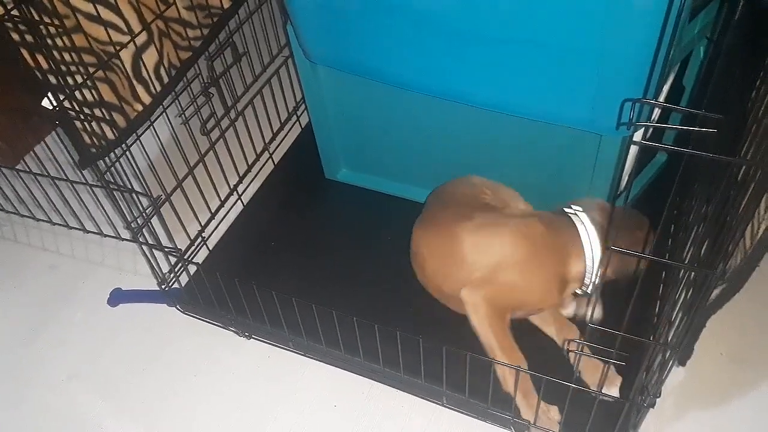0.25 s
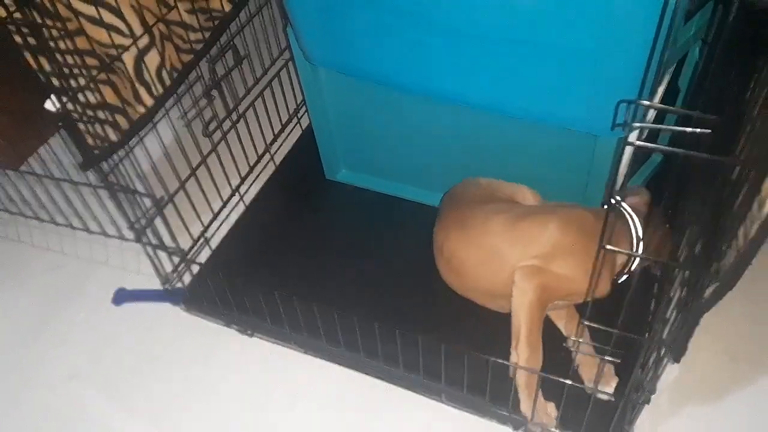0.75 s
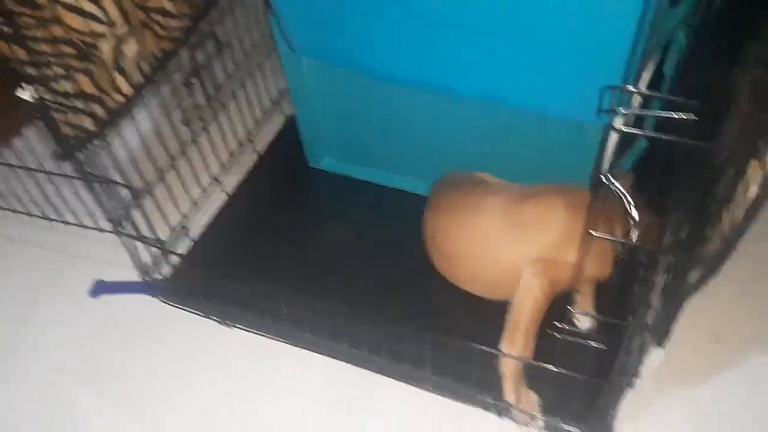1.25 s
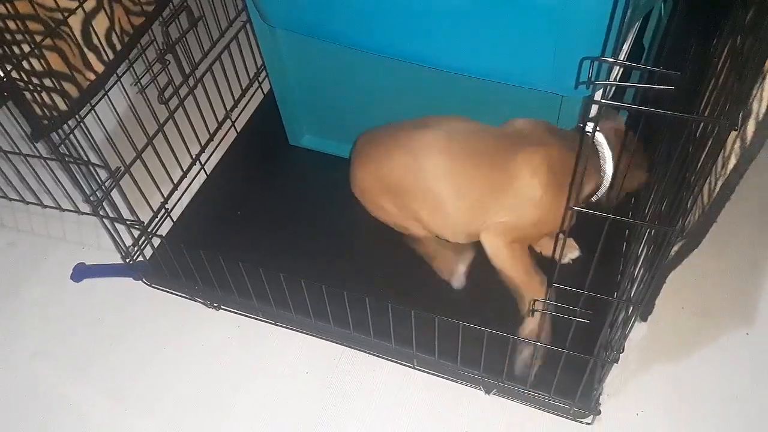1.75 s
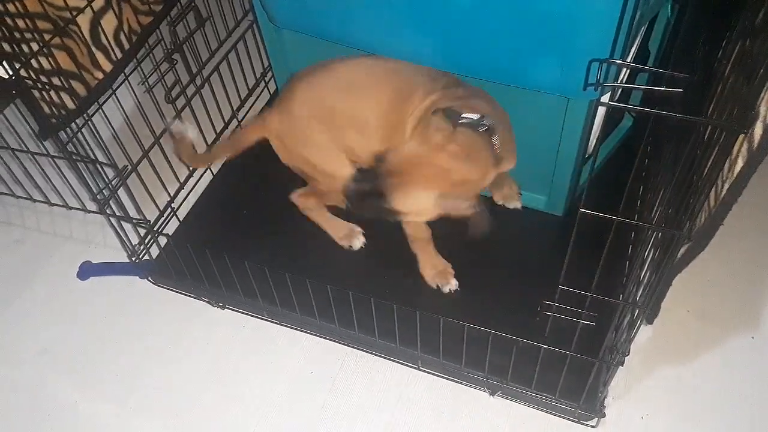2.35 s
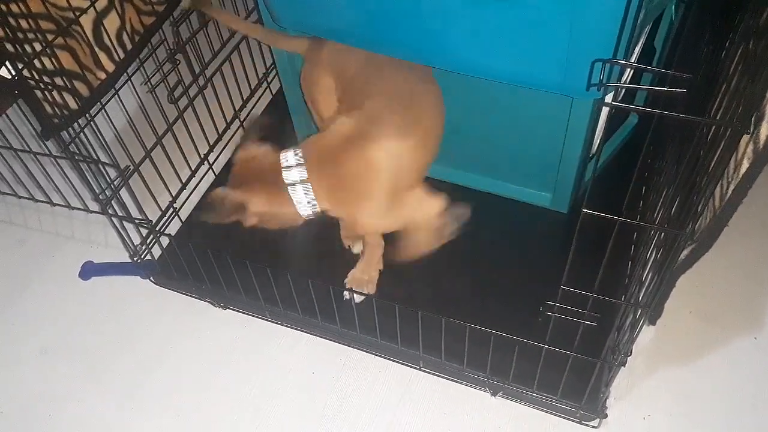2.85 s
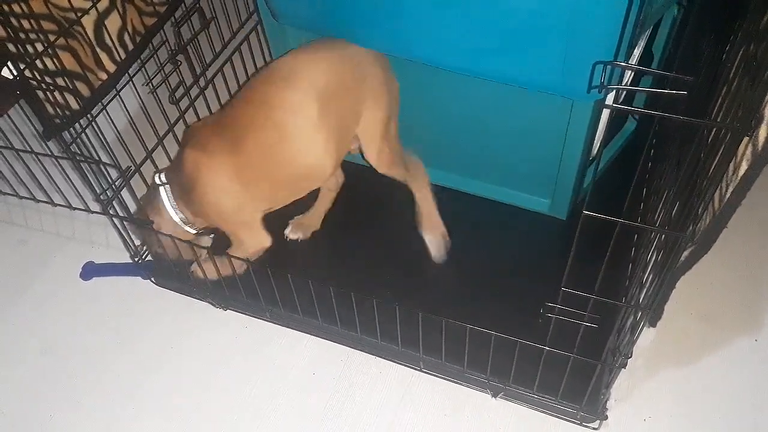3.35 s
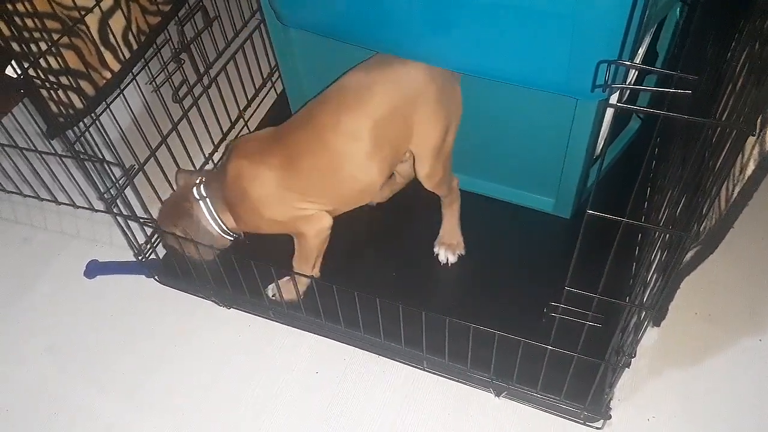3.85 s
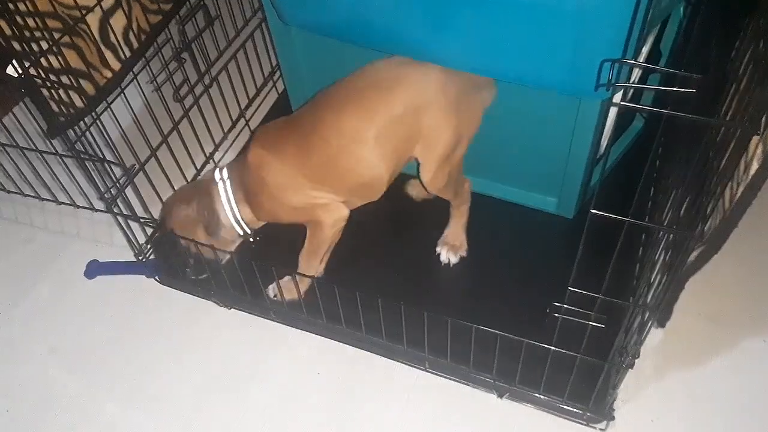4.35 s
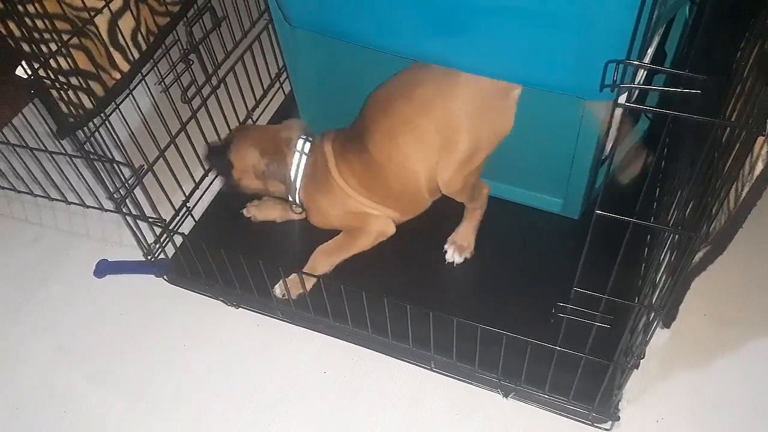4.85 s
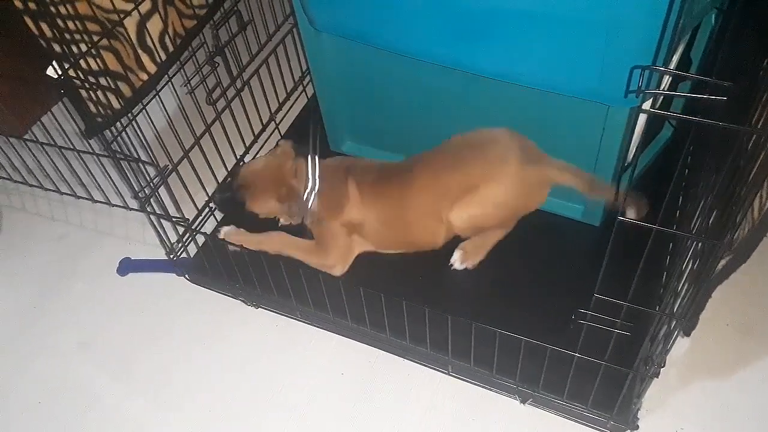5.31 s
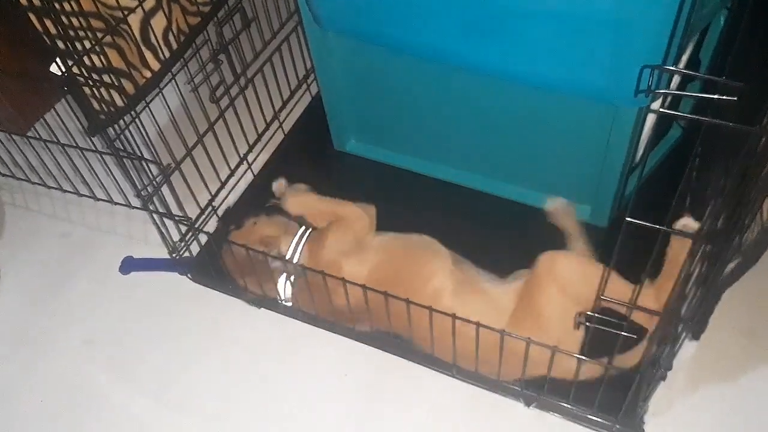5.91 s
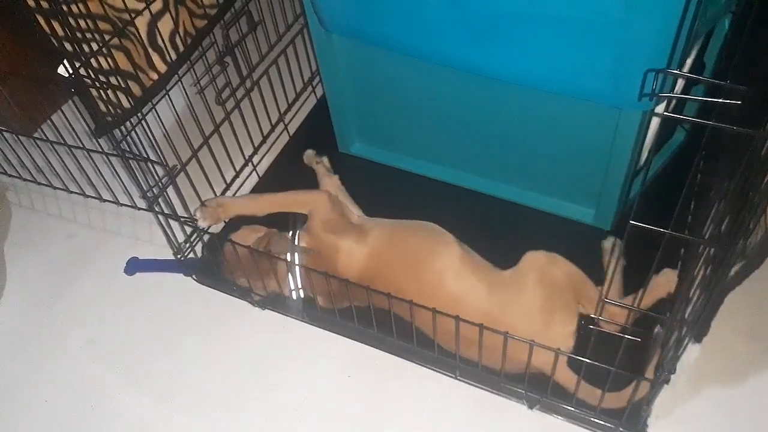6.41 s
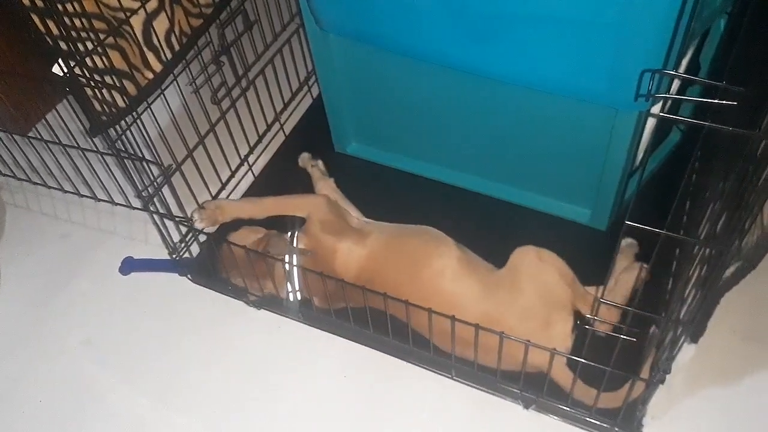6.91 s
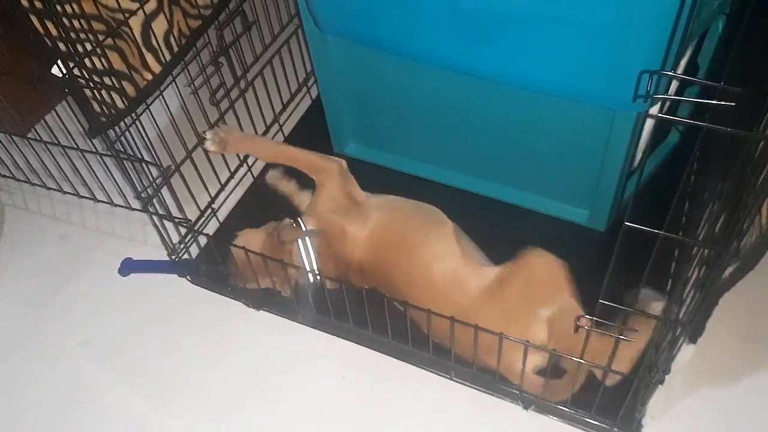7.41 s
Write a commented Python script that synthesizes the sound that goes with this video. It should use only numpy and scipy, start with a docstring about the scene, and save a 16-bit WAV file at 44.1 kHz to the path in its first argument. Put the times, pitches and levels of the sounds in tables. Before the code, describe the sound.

A puppy moves about in a wire crate with a loose plastic tray, heard close in a bare, echoing room with soft air noise and faint appliance hum. Light claw scrapes and a brief wire ring open the scene, then it is mostly quiet until 1.4 s, when hard knocks and bar clicks begin. From 1.8 to 3.8 s there is a dense scramble: scratching claws, rattling panels, singing wires and heavy padded thumps near 2.6, 3.05 and strongest at 3.4. Small scuffs follow around 4.4. From 4.5 to 5.2 s comes a hoarse, fluttering, low growl with airy rasp, ending in a thump. Scrapes lead to the loudest sharp plastic snap and clatter at 5.7, then rattles fading by 6.4. Near quiet follows, with one faint scuff at 7.2. A shorter, breathier growl runs from 7.25 to about 7.7 over a low tray rumble.

```python
"""Thumps, scrapes and clattering bars: a puppy scrambles about in a wire crate with a plastic tray,
in an echoing room, and twice lets out a hoarse, fluttering growl.
Paws and claws make bursts of tiny catches that ring the modes of tray, frame, bars and wires.
The growl is a run of throat pulses, gated by flapping tissue and shaped by moving resonances, with air
noise at the teeth. Echoes, standing waves, low rolling rumbles and steady air with hum surround it."""
import sys
import numpy as np
from scipy import signal
from scipy.fft import rfft, irfft
from scipy.io import wavfile
from scipy.ndimage import uniform_filter1d

SR = 44100
rng = np.random.default_rng(int(sys.argv[2]) if len(sys.argv) > 2 else 0)


def wav_out(sig):
    """Save sig, one row per channel (or a flat mono array), as 16-bit PCM at SR to the path in sys.argv[1]."""
    wavfile.write(sys.argv[1], SR, np.round(np.clip(np.atleast_2d(sig).T, -1, 1) * 32767).astype(np.int16))


N = 338247

# modes of the plastic tray: f/Hz, level/dB, t60/s
TRAY_MODES = [(62.5, -3, 0.5), (113.7, -9, 0.55), (144, -9.5, 0.061), (224, -0.5, 0.045), (310, 0, 0.037),
              (426, 1, 0.036), (546, 3, 0.015), (680, -2.5, 0.025), (810, 0, 0.013)]


def amp(db):
    """Decibels to gain."""
    return 10 ** (np.asarray(db) / 20)


def evened(x):
    """Scales to rms 1."""
    return x / np.sqrt(np.mean(x ** 2) + 1e-20)


def unit(x):
    """Scales to energy 1."""
    return x / np.sqrt(np.sum(x ** 2) + 1e-20)


def read(points, hz):
    """Reads a spectrum on a log-frequency axis."""
    f, value = np.transpose(points)
    return np.interp(np.log(hz + 1), np.log(f + 1), value)


def colour(x, points):
    """Filters by a spectrum in dB."""
    gain = amp(read(points, np.fft.rfftfreq(len(x), 1 / SR)))
    return irfft(rfft(x) * gain, len(x))


def band(x, lo_hz, hi_hz, order=3):
    """Causal band-pass."""
    edges_hz = [lo_hz, min(hi_hz, SR / 2 - 100)]
    return signal.sosfilt(signal.butter(order, edges_hz, "band", fs=SR, output="sos"), x)


def drift(count, size):
    """Slow random curve of rms 1, smoothed twice over size samples."""
    smooth = uniform_filter1d(rng.standard_normal(count), size)
    return evened(uniform_filter1d(smooth, size))


def add(mix, s, sound):
    """Lays a sound in; it reaches the two microphones a few samples apart."""
    lags = rng.permutation([0, rng.integers(3, 11)])
    for channel, lag in zip(mix, lags):
        start = round(s * SR) + lag
        part = channel[max(start, 0):][:len(sound) + min(start, 0)]
        part += sound[max(-start, 0):][:len(part)]


def ring(drive, modes):
    """Dying modes; every catch lands somewhere else and so weights them differently."""
    out, catches = 0, np.flatnonzero(drive)
    for hz, db, t60 in modes:
        weighted = np.zeros(len(drive))
        weighted[catches] = drive[catches] * rng.standard_normal(len(catches))
        r = np.exp(-np.log(1000) / (t60 * SR))  # decay per sample
        poles = [1, -2 * r * np.cos(2 * np.pi * hz / SR), r * r]
        mode = signal.lfilter([1, 0, -1], poles, weighted + 1e-18)
        out = out + amp(db) * unit(mode)
    return out


def resonate(x, hz, width):
    """A steep resonance that follows the curve hz, at rms 1."""
    turn = np.exp(2j * np.pi * np.cumsum(hz * np.ones(len(x))) / SR)
    r = np.exp(-np.pi * width / SR)
    # shift the resonance down to 0 Hz, smooth there, shift back
    smooth = signal.lfilter([1], [1, -2 * r, r * r], x / turn)
    return evened((turn * smooth).real)


def grains(force, per_s, spread_db):
    """Tiny catches of uneven size at random moments under a force curve."""
    size = amp(spread_db * np.minimum(rng.exponential(1, len(force)), 3))
    sign = rng.choice([-1, 1], len(force))
    return force * size * sign * (rng.random(len(force)) < per_s / SR)


def contact_levels(db, weight_db, claw_db, bars_db):
    """Levels of frame, tray, bars, wires and fizz; harder claws bring up the wires and the fizz."""
    wires_db, fizz_db = -14 + 0.85 * claw_db, -17 + claw_db
    return db + np.array([0, weight_db, bars_db, wires_db, fizz_db])


def crate(force, levels_db, per_s, spread_db):
    """Catches under a force curve ring frame, tray, bars and thin wires; claws add a fizz of their own."""
    # modes of the frame, the bars and the thin wires: f/Hz, level/dB, t60/s
    frame_modes = [(914, -10, 0.057), (1100, -2.5, 0.0041), (1103, 3, 0.011), (1364, -1.5, 0.0071),
                   (1660, -3, 0.0028), (1850, -15.5, 0.012)]
    bar_modes = [(2200, -0.5, 0.003), (2640, 3, 0.0012), (3033, -9.5, 0.027), (3560, 1, 0.0036),
                 (4370, -3, 0.0032)]
    wire_modes = [(5120, -3.5, 0.0017), (6410, -14.5, 0.018), (6430, -1.5, 0.0019)]
    bar_spread = 0.081  # share by which the pitch of the bars varies between contacts
    drive = np.pad(grains(force, per_s, spread_db), (0, SR // 10))  # room for the ring to die away
    detuned = [(hz * (1 + bar_spread * rng.uniform(-0.85, 1)), db, t60) for hz, db, t60 in bar_modes]
    parts = [band(ring(drive, frame_modes), 857, 3140, order=4),
             band(ring(drive, TRAY_MODES), 68, 1120, order=2),
             band(ring(drive, detuned), 1770, 4950),
             band(ring(drive, wire_modes), 4800, 7370, order=7),
             band(drive, 5300, 14000, order=2)]
    mixed = sum(amp(db) * unit(part) for db, part in zip(levels_db, parts))
    return np.sqrt(SR / 50) * mixed  # 0 dB is the energy of 20 ms at rms 1


def knocks(catches_per_s=2200, slips_per_s=700, spread_db=3, bite=0.71, bite_s=0.0059, stutter_db=3):
    """A blow, after which the loose panels chatter and settle while the paw slides on."""
    # blows on the crate: t/s, strength/dB, weight on the tray/dB, claw hardness/dB,
    # ring of the bars/dB, clatter decay/s (held to at least 3 ms)
    blows = [(.067, -35, -19, 1, -6, 0.015), (.835, -47.5, -5, -10, -10.5, 0.039),
             (0.943, -45.5, 5, -13, -14, .025), (1.4212, -25, 1.5, -1, -3, 0.016),
             (1.553, -28.5, 1.5, -2, -8.5, 0.054), (1.659, -46, 2.5, -5, -4, 0.0052),
             (1.799, -38.5, -3, 0, -4, 0.023), (1.821, -21, -1, -0.5, -5.5, 0.026),
             (2.226, -36.5, -2.5, 9, -0.5, 0.053), (2.285, -38.5, -1, 9, -4.5, 0.0071),
             (2.355, -23.5, 2, -4.5, -8, 0.027), (2.686, -44, -12, 0, -6, 0.026),
             (2.746, -23.5, -1, -10.5, -5.5, 0.0086), (3.089, -28.5, -2.5, -3, -9.5, 0.016),
             (3.104, -32, 4, 2.5, -1.5, 0.0073), (3.335, -29, -4.5, -6, -7, 0.02),
             (3.398, -23.5, -1.5, 3, -7, 0.047), (3.515, -21.5, -1, 2.5, -5.5, 0.025),
             (3.614, -33, -4, 15.5, -1, 0.022), (3.696, -39.5, 1, 2, 2.5, 0.0026),
             (4.379, -41, 9.5, -5, -3.5, 0.014), (5.124, -23.5, -3.5, -4.5, -10.5, 0.0055),
             (5.467, -37, -5, -1, -7.5, 0.026), (5.561, -35.5, -0.5, 5.5, 0, 0.014),
             (5.603, -38, 3, -16, -2, 0.016), (5.887, -35, -2.5, -2, -7, 0.029),
             (5.932, -42, -3, 13, -4, 0.01), (6.115, -43, 7, 15, 4, 0.015)]
    rise_s, rattle_s, chatter_db = .0013, .012, 3.4
    slide_s, slide_db = 0.032, -8.5
    out, t = np.zeros((2, N)), np.arange(SR // 4) / SR
    for s, db, weight_db, claw_db, bars_db, clatter_s in blows:
        levels_db = contact_levels(db, weight_db, claw_db, bars_db)
        force = (1 - np.exp(-t / rise_s)) * np.exp(-t / max(clatter_s, .003)) * (1 - t / t[-1])
        force *= 1 + bite * np.exp(-t / bite_s)  # the first contact is the hardest
        rattle = (drift(len(t), size=70) - .5) * (1 - np.exp(-t / rattle_s))
        force *= amp(chatter_db * rattle)  # then the panels rattle unevenly
        add(out, s, crate(force, levels_db, catches_per_s, spread_db))
        slide = t / slide_s * np.exp(-t / slide_s) * amp(stutter_db * drift(len(t), size=180))
        add(out, s, crate(slide, levels_db + slide_db, slips_per_s, spread_db))
    return out


def scrapes(bars_db=-6.0, bars_per_claw=0.48):
    """Each stroke swells and fades as a dense stream of small catches."""
    # strokes of claws and body along tray and bars: middle t/s, strength/dB, weight on the tray/dB,
    # claw hardness/dB, half length/s
    strokes = [(0.022, -32.5, -11, 2.5, 0.053), (0.139, -41, -2, 9.5, 0.14), (0.652, -56, 9, -5, 0.043),
               (0.852, -47.5, -1, 4, 0.47), (1.361, -45, 3, 5.5, 0.046), (1.414, -34.5, -7, 2, 0.01),
               (1.649, -49, 8, 14.5, 0.14), (1.814, -24, -3.5, -8, 0.0089), (1.938, -31.5, -1.5, 7.5, 0.13),
               (2.086, -27, -20, 11, 0.028), (2.124, -32, -12, 16, 0.026), (2.329, -31.5, -8.5, 7.5, 0.019),
               (2.42, -33.5, 7.5, -1, 0.05), (2.553, -40.5, -1, 3.5, 0.13), (2.708, -39.5, -0.5, -2, 0.028),
               (2.815, -44.5, 12, 13.5, 0.056), (3.221, -35, -1.5, 6.5, 0.13), (3.312, -36, -4, 8, 0.018),
               (3.559, -35.5, 7, -10, 0.034), (3.69, -29, -4.5, -10, 0.043), (4.355, -39.5, 1, -7.5, 0.036),
               (4.448, -38, 2.5, -2.5, 0.047), (5.214, -30, -4, 8, 0.097), (5.41, -42, -24, 11.5, 0.041),
               (5.668, -24.5, -7.5, -1.5, 0.065), (5.733, -36.5, 6.5, 14, 0.11),
               (5.957, -29, -2.5, 5, 0.031), (6.018, -28, 0.5, 4, 0.054), (6.138, -36.5, -2, 12, 0.032),
               (6.258, -35.5, -2, 3, 0.039), (6.34, -42, 5, 2, 0.094), (7.172, -45, 2, 2, 0.056)]
    out = np.zeros((2, N))
    catches_per_s, spread_db, stutter_db = 6000, 2.3, 2.4
    for s, db, weight_db, claw_db, half_s in strokes:
        t = np.arange(-2 * half_s, 2 * half_s, 1 / SR)
        stutter = amp(stutter_db * drift(len(t), size=180))  # claws stick and slip
        force = np.exp(-(t / half_s) ** 2) * stutter
        levels_db = contact_levels(db, weight_db, claw_db, bars_db + bars_per_claw * claw_db)
        add(out, s + t[0], crate(force, levels_db, catches_per_s, spread_db))
    return out


def thumps(push_s=0.00392, push_db=2, settle_s=0.041):
    """A padded paw gives one slow push; the loose tray rumbles after it."""
    # soft paws landing on the tray: t/s, level/dB, pitch f/Hz
    landings = [(0.203, -33, 190), (2.568, -15, 275), (2.596, -25, 198), (2.614, -26, 219),
                (2.723, -31, 220), (3.046, -21, 234), (3.435, -11.5, 310), (3.467, -17.5, 214),
                (3.813, -29.5, 240), (4.218, -36.5, 252), (5.18, -15.5, 357)]
    out, t = np.zeros((2, N)), np.arange(SR // 4) / SR
    for s, db, hz in landings:
        u = (np.pi * hz * (t - push_s)) ** 2
        push = amp(push_db) * (1 - 2 * u) * np.exp(-u)
        catches = grains(np.exp(-t / settle_s), 900, 1.1)
        rumble = band(ring(catches, TRAY_MODES), 96, 1.25 * hz, order=3)
        add(out, s, amp(db) * (push + unit(rumble) * np.linalg.norm(push)))  # equal energies
    return out


def snaps():
    """The plastic tray snaps under the puppy's weight: one hard click with a very short ring."""
    # snaps: t/s, peak level/dB
    moments = [(.637, -35), (3.696, -14), (5.6625, -4.5), (6.198, -18.5), (6.349, -23.5)]
    # modes of the snapping plastic: f/Hz, level/dB, t60/s
    snap_modes = [(680, 13, 0.034), (1076, 18, 0.021), (1570, 8.3, 0.049)]
    out, t = np.zeros((2, N)), np.arange(SR // 20) / SR
    click = sum(amp(db - 60 * t / t60) * np.sin(2 * np.pi * hz * t) for hz, db, t60 in snap_modes)
    for s, db in moments:
        add(out, s, amp(db) * click / abs(click).max())
    return out


def ticks(tick_db=-1, ring_s=0.01, upper_db=-4, crack_s=0.00071, body_db=-4):
    """A claw clicks on one bar: a hard crack, the bar's short ring and a jolt of the frame."""
    # claws clicking on single bars: t/s, level/dB, pitch f/Hz
    clicks = [(.0675, -21.5, 2320), (1.4217, -17, 3250), (1.8235, -20, 3420), (1.864, -21, 4340),
              (2.2865, -25, 2320), (2.7462, -20, 1740), (3.1055, -16, 3970), (3.3365, -17, 2250),
              (3.398, -16, 3520), (3.516, -19, 3100), (3.696, -19.5, 3800), (3.7184, -32, 3400),
              (5.1248, -24, 2700), (5.5613, -24, 3500), (5.675, -9.5, 3280), (6.0102, -16, 2980),
              (6.1145, -35, 6800)]
    out, t = np.zeros((2, N)), np.arange(SR // 16) / SR
    for s, db, hz in clicks:
        crack = rng.standard_normal(len(t)) * np.exp(-t / crack_s)
        bar = np.sin(2 * np.pi * hz * t) + amp(upper_db) * np.sin(2 * np.pi * 1.47 * hz * t)
        bar *= amp(-60 * t / ring_s)
        jolt = unit(band(crack, 530, 2000, order=2))
        tick = unit(bar) + unit(band(crack, 1500, 5700, order=2)) + amp(body_db) * jolt
        add(out, s, amp(db + tick_db) * tick / abs(tick).max())
    return out


def drags():
    """A claw rubs across the wires and keeps their lightly damped modes sounding."""
    # claws dragged across the grille so that it sings: middle t/s, level/dB, half length/s
    rubs = [(0.032, -47, 0.016), (.09, -37.5, 0.027), (2.104, -34.5, 0.036), (2.33, -46, 0.02),
            (3.303, -37.5, 0.0084), (3.621, -37, 0.013), (5.718, -44, .02), (6.133, -43, .02)]
    # modes the grille sings with: f/Hz, level/dB, t60/s
    grille_modes = [(1150, 1.5, 0.13), (1252, 4, 0.13), (2271, 0, 0.068), (4680, -11.5, 0.082),
                    (5380, -10, 0.053), (6170, -4, 0.096), (6600, -9, 0.049), (7150, -2.5, 0.051)]
    out = np.zeros((2, N))
    for s, db, half_s in rubs:
        t = np.arange(-2 * half_s, 2 * half_s + .1, 1 / SR)
        sing = ring(grains(np.exp(-(t / half_s) ** 2), 5000, 0.63), grille_modes)
        add(out, s + t[0], amp(db) * np.sqrt(2 * half_s * SR) * unit(band(sing, 1040, 10700)))
    return out


def skates(squeak_hz=6400, fizz_db=-13):
    """A claw sliding along a wire: a thin rasp with a squeak in it."""
    # claws skating on wire: middle t/s, level/dB, half length/s
    slides = [(4.824, -42.5, .014), (5.019, -35.5, 0.014), (7.424, -45, 0.019)]
    out = np.zeros((2, N))
    for s, db, half_s in slides:
        t = np.arange(-2 * half_s, 3 * half_s, 1 / SR)
        drive = grains(np.exp(-(t / half_s) ** 2), 3000, 3.6)
        fizz = evened(band(drive, 6600, 14700))
        rasp = evened(band(drive, 2140, 7000, order=5)) + amp(fizz_db) * fizz
        add(out, s + t[0], amp(db) * (rasp + resonate(drive, squeak_hz, 586)) / 2)
    return out


def growl(curve, flaps_per_s, teeth_open_hz, teeth_closed_hz, teeth_db, flap_share=0.18, chest_db=-8,
          cheek_db=-15.5, mouth_width_hz=245, upper_db=-12, lip_db=-11.0, air_flutter=0.88):
    """Flapping tissue sets off dying runs of throat pulses, shaped by chest, throat and a closing mouth."""
    # air forced past the teeth: f/Hz, level/dB
    rasp_spectrum = [(700, -20), (1300, -12.5), (2200, 0.5), (3600, -2), (4800, -12), (7000, -10.5),
                     (8200, -25), (11000, -20), (15000, -24)]
    folds_hz, fold_jitter, flap_jitter = 150, .12, .05
    rough = .2  # share of noise in the voice
    mouth_rest_hz = 1020  # the muzzle resonance follows the mouth around this point
    attack_s, release_s = 0.0035, 0.046
    times, *columns = np.transpose(curve)
    t = np.arange(times[0], times[-1], 1 / SR)
    effort_db, mouth_hz, throat_db, muzzle_db, air_db, depth = (
        np.interp(t, times, column) for column in columns)

    flaps = np.cumsum(flaps_per_s * (1 + flap_jitter * drift(len(t), size=260))) / SR
    depth, since = np.clip(depth, 0, 1), flaps % 1
    gate = 1 - depth + depth * np.exp(-since / flap_share)
    gate /= np.sqrt(uniform_filter1d(gate ** 2, round(SR / flaps_per_s)))  # depth leaves loudness alone

    cycles = np.cumsum(folds_hz * (1 + fold_jitter * drift(len(t), size=150))) / SR
    new_flap = np.diff(np.floor(flaps), prepend=-1) > 0
    cycles -= np.maximum.accumulate(cycles * new_flap)  # the folds restart at each flap
    pulses = (np.diff(np.floor(cycles), prepend=-1) != 0) * amp(1.1 * drift(len(t), size=100))
    drive = gate * ((1 - rough) * evened(pulses) + rough * rng.standard_normal(len(t)))

    cheek = amp(cheek_db) * resonate(drive, 665, 84)
    lips = amp(lip_db) * resonate(drive, 1.298 * mouth_hz, 180)
    mouth = resonate(drive, mouth_hz, mouth_width_hz) + cheek + lips
    throat = resonate(drive, 371, 149) + amp(chest_db) * resonate(drive, 152, 34)
    muzzle = resonate(drive, 1570 * (mouth_hz / mouth_rest_hz) ** .33, 130)

    hiss = (1 - air_flutter + air_flutter * gate) * rng.standard_normal(len(t))
    glide = np.linspace(0, 1, len(t)) ** 2
    gap_hz = teeth_open_hz * (teeth_closed_hz / teeth_open_hz) ** glide
    teeth = resonate(hiss, gap_hz, 900) - amp(upper_db) * resonate(hiss, 1.55 * gap_hz, 1200)
    air = amp(teeth_db) * teeth + evened(colour(hiss, rasp_spectrum))

    voice = mouth + amp(throat_db) * throat + amp(muzzle_db) * muzzle + amp(air_db) * air
    edges = np.minimum(1, np.minimum((t - t[0]) / attack_s, (t[-1] - t) / release_s))
    return t[0], amp(effort_db) * edges * band(voice, 84, 15000)


def growls():
    """A long growl and a later short one; the resonance at the teeth glides down in both."""
    # growl curves: t/s, effort/dB, mouth resonance f/Hz, throat/dB, muzzle/dB, air at the teeth/dB,
    # flutter depth (0-1)
    long_curve = [(4.507, -44, 1290, 2, -12, -18, .3), (4.572, -35, 1090, -6, -18, -15.5, 0.8),
                  (4.66, -30, 1060, -9, -20, -20, 0.44), (4.73, -31, 940, 0, -8, -17.5, 0.4),
                  (4.79, -27.5, 920, -7.5, -8, -15.5, 0.4), (4.835, -24, 865, -2.5, -7.5, -21, 0.36),
                  (4.89, -27.5, 880, -1, -10, -20, 0.54), (4.965, -25, 793, 1.5, -10.5, -22, .45),
                  (5.04, -30.5, 760, -2.5, -10, -25, 0.4), (5.2, -30.5, 765, 1.5, -12, -27, 0.4)]
    short_curve = [(7.252, -31.5, 890, -11, -21, -15, 0.54), (7.3, -33.5, 900, 1.5, -16, -10, 0.66),
                   (7.38, -23, 924, -12, -17, -18, 0.59), (7.415, -28, 900, -2, -17, -13, .4),
                   (7.485, -28.5, 840, -0.5, -17, -13, .55), (7.55, -32.5, 870, -3.5, -11, -6, .5),
                   (7.6, -36, 810, -3.5, -10, -10.5, 0.46), (7.69, -45, 825, 2, -9, 0, .4)]
    out = np.zeros((2, N))
    add(out, *growl(long_curve, flaps_per_s=32.2, teeth_open_hz=3550, teeth_closed_hz=2130, teeth_db=0))
    add(out, *growl(short_curve, flaps_per_s=31, teeth_open_hz=2160, teeth_closed_hz=1900, teeth_db=-3.6))
    return out


def rolls(low_hz=45, high_hz=125):
    """The tray flexes with a low rumble under the rolling body."""
    # the body rolling its weight over the tray: middle t/s, level/dB, half length/s
    shifts = [(0.252, -48, 0.073), (2.7, -49, 0.146), (7.54, -41, 0.13)]
    t = np.arange(N) / SR
    weight = sum(amp(db) * np.exp(-((t - s) / half_s) ** 2) for s, db, half_s in shifts)
    return weight * evened(band(rng.standard_normal(N), low_hz, high_hz))


def spread(mid, side):
    """Diffuse sound: alike at both microphones in the bass, unrelated above."""
    # stereo width: f/Hz, side against mid/dB
    width_curve = [(60, -16), (170, -15.5), (350, -10.5), (700, -2), (1500, -0.5), (12000, -0.5)]
    side = colour(side, width_curve)
    return np.array([mid + side, mid - side]) / np.sqrt(2)


def reflections(early_db=7, early_s=0.084, gap_s=0.0021):
    """Close walls answer first, then the room dies away band by band."""
    # reverberation: f/Hz, t60/s
    decay_curve = [(100, 2), (300, 1.04), (1000, 0.78), (4000, 0.61), (12000, .5)]
    t = np.arange(SR) / SR
    density = (t > gap_s) * (1 + amp(early_db) * np.exp(-t / early_s))
    hz, when, z = signal.stft(grains(density, 3000, 0.95), SR, nperseg=256)
    fade = amp(-60 * when / read(decay_curve, hz)[:, None])
    return unit(signal.istft(z * fade, SR, nperseg=256)[1][:SR])


def room(x, turn_hz=9):
    """Three sets of reflections take turns at a steady rate, so the echo stays smooth and even."""
    angle = 2 * np.pi * turn_hz * np.arange(N) / SR
    out = np.zeros((2, N))
    for k in range(3):
        turn = np.sqrt(2 / 3) * np.cos(angle + 2 * np.pi * k / 3)  # powers of the three add up to 1
        echoes = spread(reflections(), reflections())
        out += signal.fftconvolve((x * turn)[None], echoes, axes=1)[:, :N]
    return out


def standing(x):
    """Low room resonances that hang on after every sound, alike at both microphones."""
    # standing waves between the walls: f/Hz, width/Hz, level/dB
    wall_modes = [(146.3, 0.77, 11.5), (186.5, 5.8, -2), (220, 3.4, -32), (340, 7.1, -39), (394, 6.4, -1),
                  (642, 3.4, 5.5), (886, 43, -1)]
    return sum(amp(db) * signal.lfilter(*signal.iirpeak(hz, hz / width, SR), x)
               for hz, width, db in wall_modes)


def background(air_level_db=-53.5, waver=0.085):
    """Room air as coloured noise, with the faint phase-wavering tones of an appliance."""
    # spectrum of the air: f/Hz, level/dB
    air_spectrum = [(18, -82), (30, -2), (108, -8), (332, -5), (518, -15), (673, -8), (852, -15.5),
                    (970, -7.5), (1360, -18.5), (1510, -14), (2240, -16), (3230, -22.5), (6210, -25.5),
                    (8720, -35.5), (15500, -44)]
    # appliance tones: f/Hz, level/dB
    hum_tones = [(113, -61.5), (334, -63.5), (996, -63.5), (2261, -72.5)]
    t = np.arange(N) / SR
    air = spread(*(evened(colour(rng.standard_normal(N), air_spectrum)) for _ in range(2)))
    hum = sum(amp(db) * np.sqrt(2) * np.sin(2 * np.pi * hz * t + waver * drift(N, size=5000))
              for hz, db in hum_tones)
    return amp(air_level_db) * np.sqrt(2) * air + hum


def scene(room_db=-1, growl_send_db=-3, snap_send_db=-6, thump_send_db=-4, standing_db=-2):
    """Crate and puppy, heard directly and through the room."""
    rattle = knocks() + scrapes() + skates() + ticks() + drags()
    paws, clicks, voice = thumps(), snaps(), growls()
    send = rattle + amp(growl_send_db) * voice + amp(snap_send_db) * clicks + amp(thump_send_db) * paws
    send = send[0]  # one channel feeds the room
    direct = rattle + voice + paws + clicks
    echoes = amp(room_db) * room(send) + amp(standing_db) * standing(send)
    return direct + echoes + rolls() + background()


def record(dry):
    """A small microphone pair, the right a little louder, with a dip above 7.5 kHz; then the band limit."""
    # microphone response: f/Hz, level/dB
    response = [(40, -23.5), (100, -4.5), (500, -2.0), (2000, 1.5), (7100, 4.0), (7900, -2.0),
                (9200, -4.5), (11000, -0.5), (15500, -0.5)]
    balance_db = [[-.4], [.4]]  # left, right
    heard = np.array([colour(channel, response) for channel in dry]) * amp(balance_db)
    low_pass = signal.firwin(511, 16050, window=("kaiser", 9), fs=SR)  # cutoff in Hz
    return signal.oaconvolve(heard, low_pass[None], "same")


dry = scene()
out = record(dry)
wav_out(out)
```